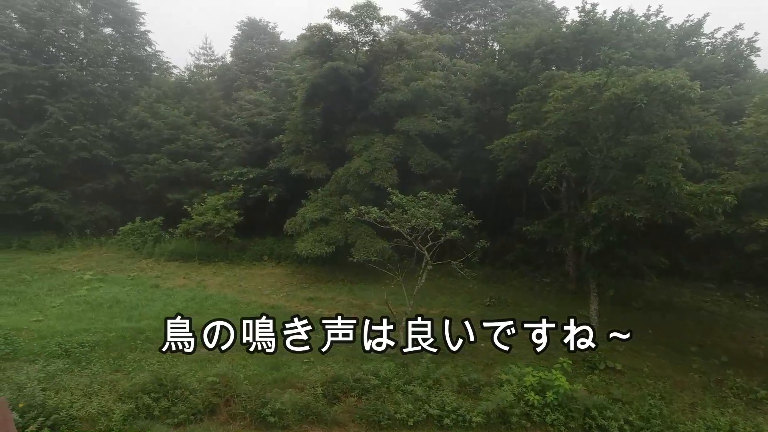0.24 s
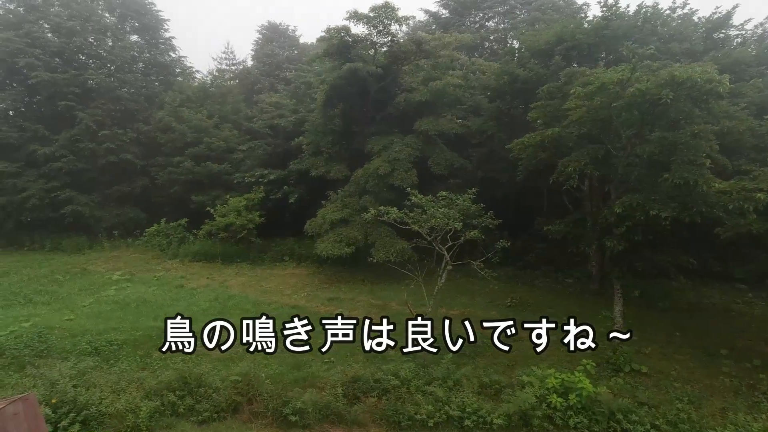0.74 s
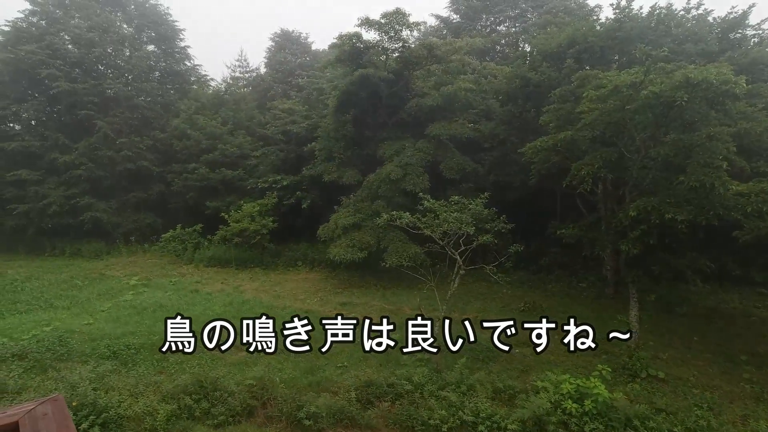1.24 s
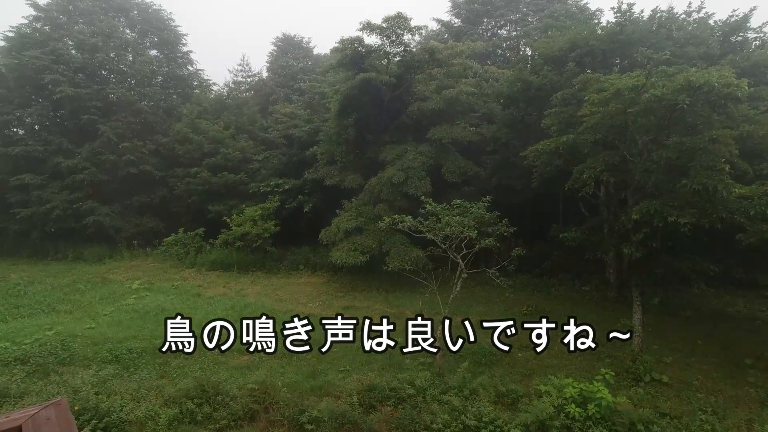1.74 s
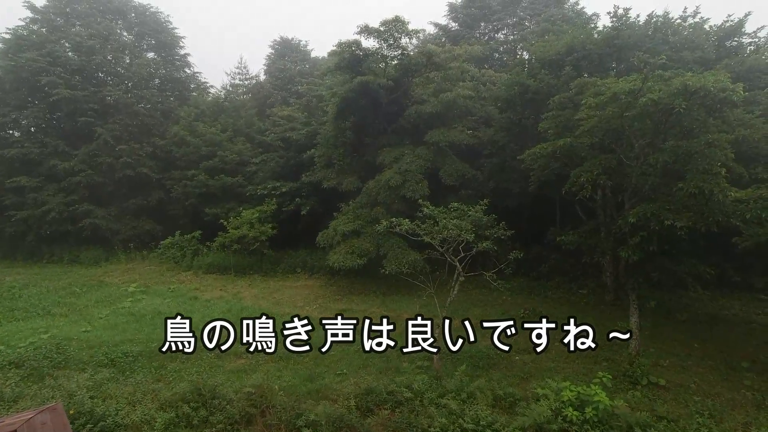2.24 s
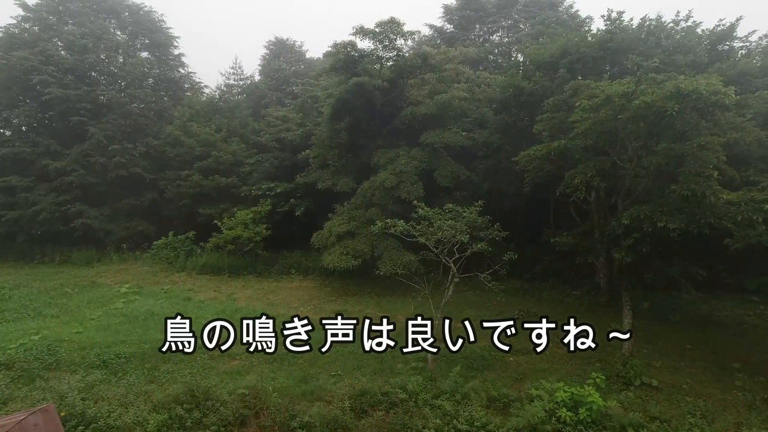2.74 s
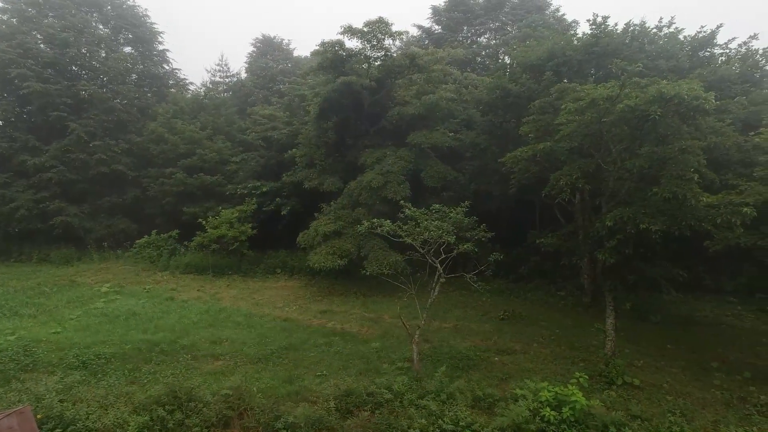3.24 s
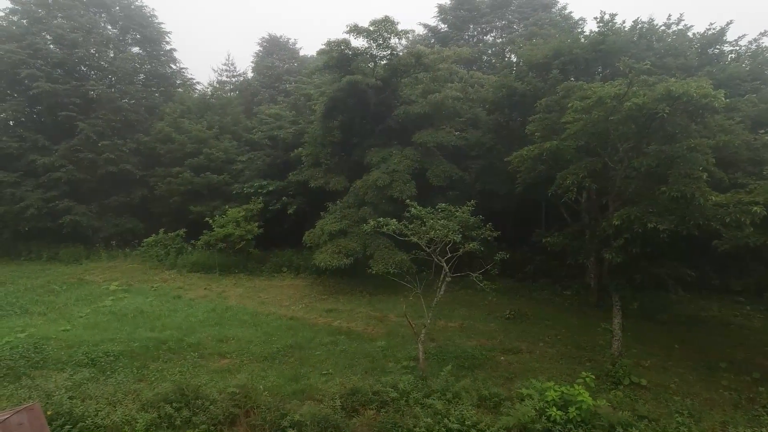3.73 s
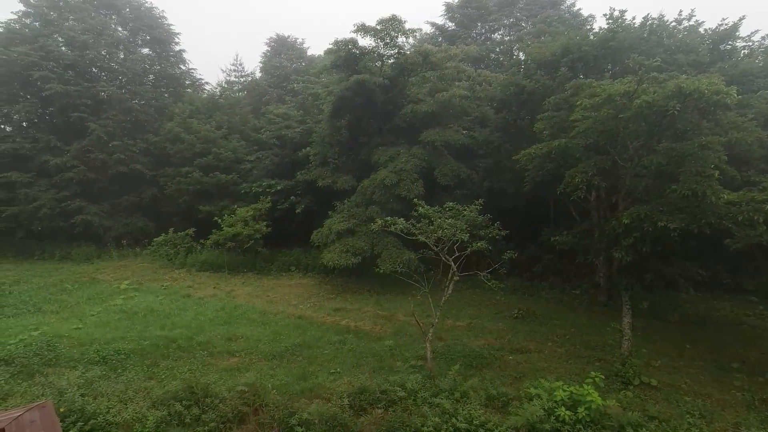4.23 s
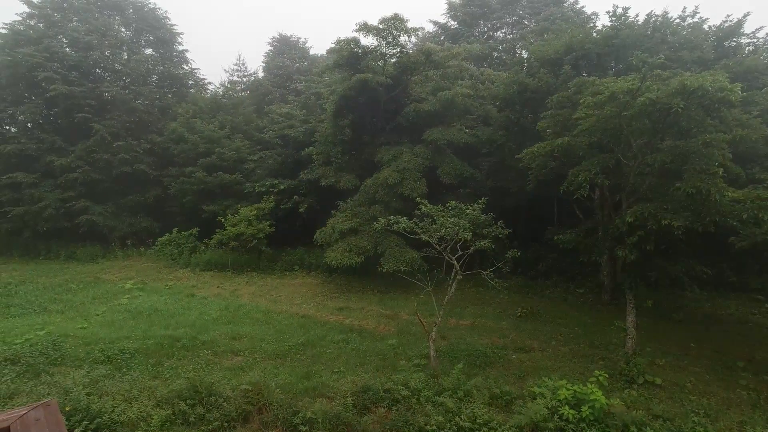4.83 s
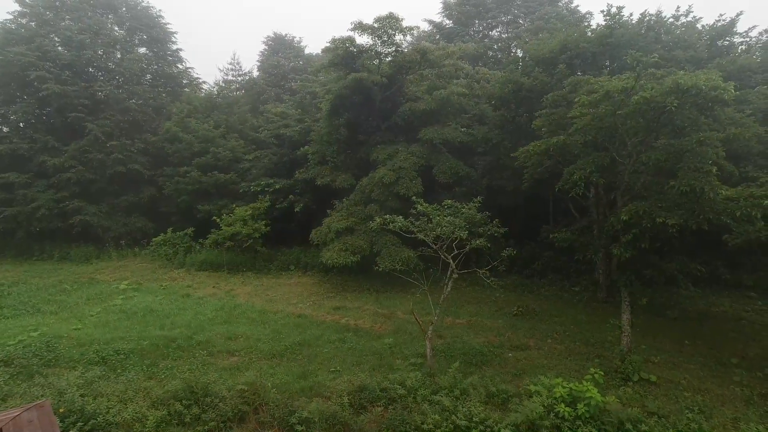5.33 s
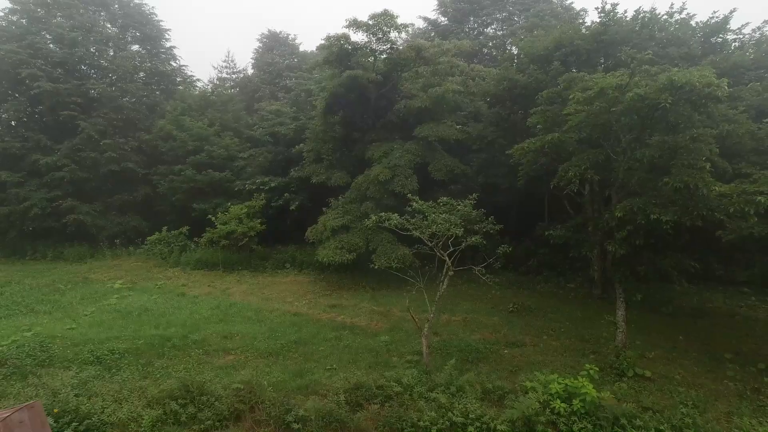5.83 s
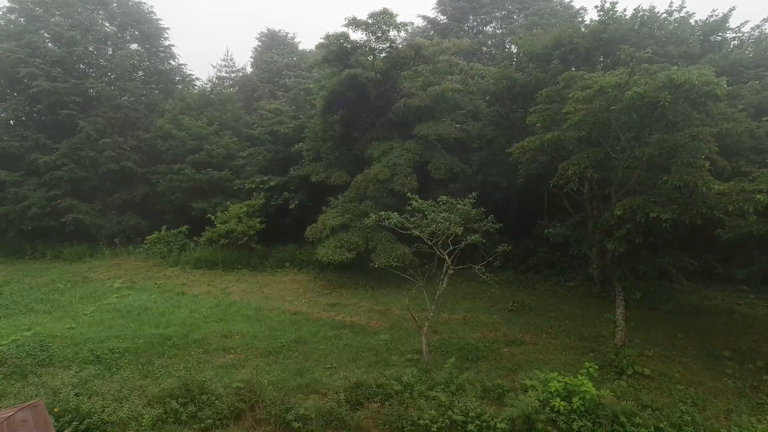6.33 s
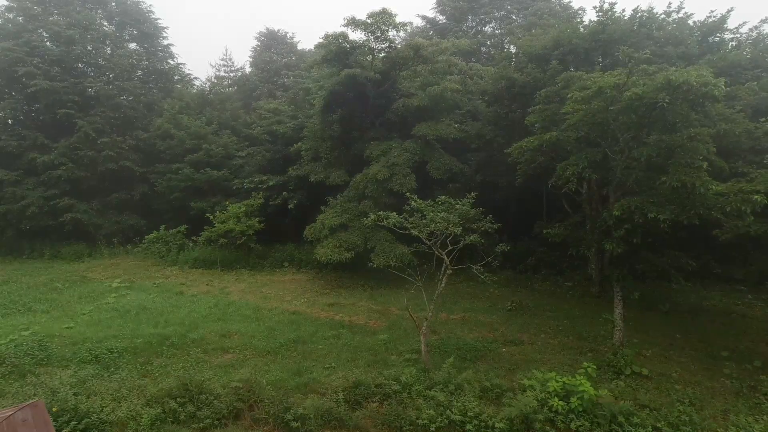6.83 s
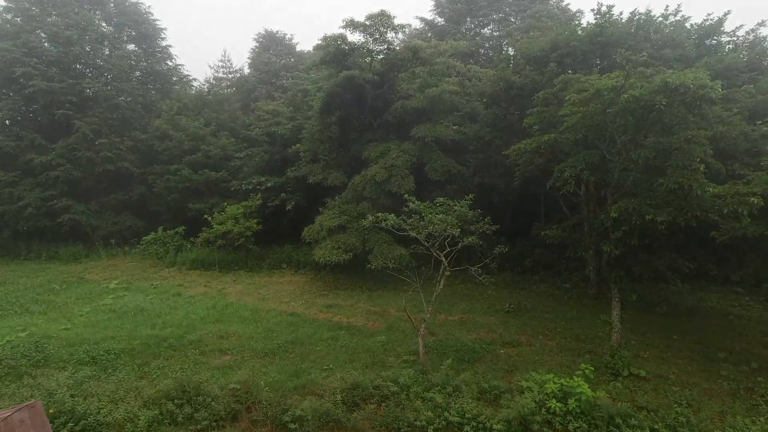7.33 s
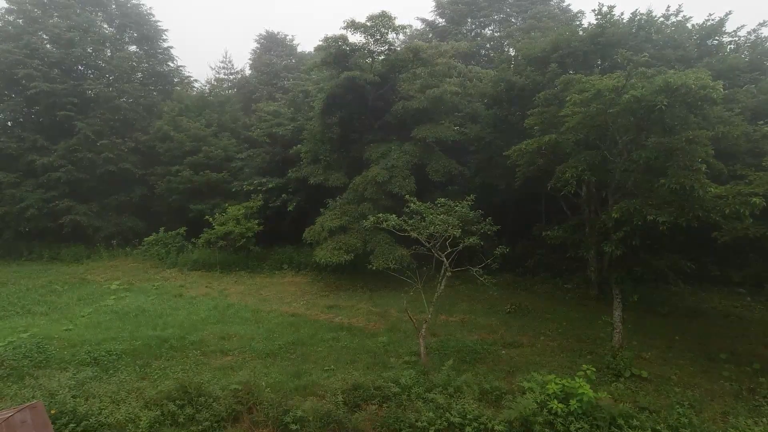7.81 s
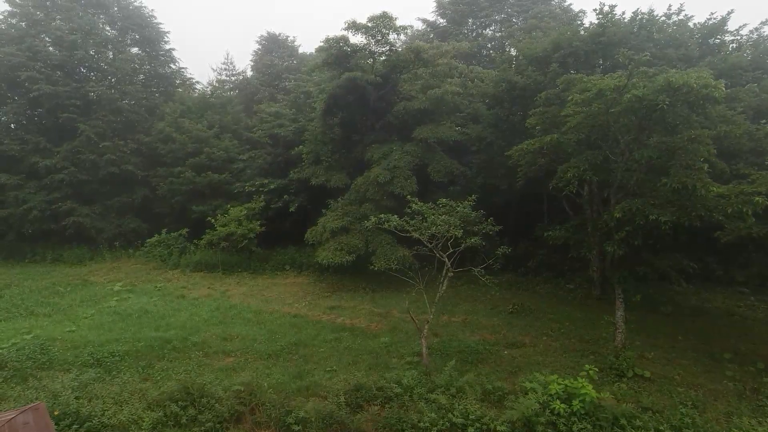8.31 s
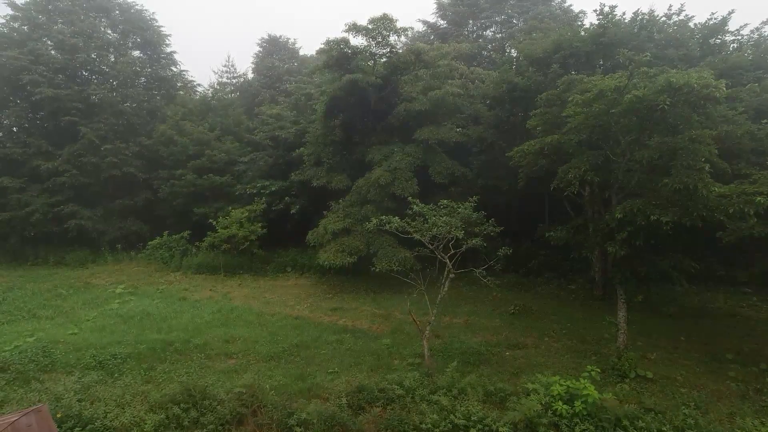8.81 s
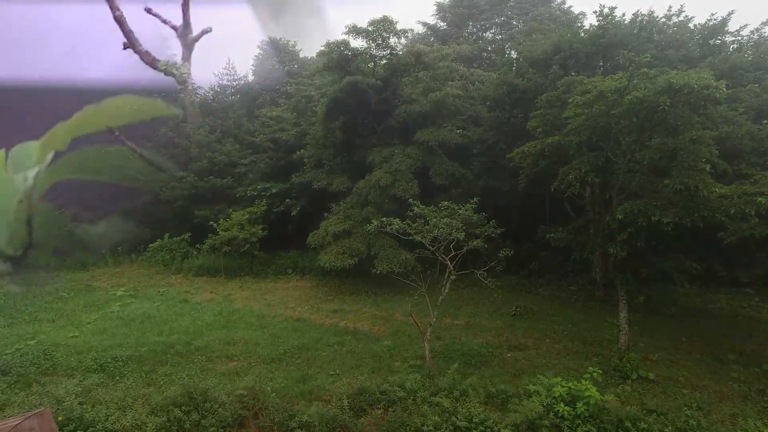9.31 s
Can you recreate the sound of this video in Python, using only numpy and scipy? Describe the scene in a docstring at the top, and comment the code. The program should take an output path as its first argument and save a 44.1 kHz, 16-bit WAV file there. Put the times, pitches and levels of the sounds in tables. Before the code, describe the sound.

Outdoor bird calls over a very soft hiss of far drizzle and leaves. A bright, slightly metallic whistle sounds first with a deep handling thump, then raspy scolding arrives in quick bursts, about twelve or thirteen rasps a second. The whistled phrase returns around four and seven seconds, each time amid chatter. Thin high peeps and low far whistles fill the gaps. A hollow wooden tap falls near five seconds; light rumble stays close to the microphone.

```python
"""A bird scolds in rasping chatter, each rasp a ragged pulse train coloured by throat resonances.
Another sings whistles of two gliding voices that mix into sum and difference tones at a misty wood's edge.
Farther birds chip and whistle faintly as hoarse gliding tones; sparse echoes make the trees answer.
A hand-held camera rumbles, hums and thumps on its mount, wooden modes ring under a knock and a
fainter, brighter one, and shaped noise gives distant drizzle and leaves."""
import sys
import numpy as np
from scipy import signal
from scipy.io import wavfile
from scipy.ndimage import uniform_filter1d

SR = 44100
rng = np.random.default_rng(int(sys.argv[2]) if len(sys.argv) > 2 else 0)


def dump(signal):
    """Clip the signal to [-1, 1] and save it as 16-bit WAV at the path in sys.argv[1]."""
    limited = np.clip(np.atleast_2d(signal).T, -1, 1)
    pcm = np.round(limited * 32767).astype(np.int16)
    wavfile.write(sys.argv[1], SR, pcm)


N = 421596


def amp(db):
    """Level law: decibels become a linear gain."""
    return 10 ** (np.asarray(db) / 20)


def evened(x):
    """Power normalization: scales a signal to rms 1."""
    return x / np.sqrt(np.mean(x ** 2) + 1e-20)


def read(points, hz):
    """Spectral envelope: interpolates a table along a log-frequency axis."""
    f, value = np.transpose(points)
    return np.interp(np.log(hz + 1), np.log(f + 1), value)


def add(mix, s, sound):
    """Superposition: adds a sound in place at time s in seconds."""
    part = mix[max(round(s * SR), 0):][:len(sound)]
    part += sound[:len(part)]


def unroll(rows):
    """Piecewise-linear motion: sample times and columns of a curve table."""
    s, *columns = np.transpose(rows)
    t = np.arange(s[0], s[-1], 1 / SR)
    return [t] + [np.interp(t, s, column) for column in columns]


def wander(count, hz):
    """Low-passed noise: smooth chance up to about hz, rms 1."""
    settling = 4000
    noise = rng.standard_normal(count + settling)
    return evened(signal.lfilter(*signal.butter(2, hz, fs=SR), noise)[settling:])


def tone(hz, db):
    """Phase accumulation: a sine of given rms level along a pitch curve, with soft ends."""
    phase = 2 * np.pi * np.cumsum(hz) / SR
    soft_ends = signal.windows.tukey(len(hz), min(250 / len(hz), 1))
    return np.sqrt(2) * amp(db) * np.sin(phase) * soft_ends


# Spectrum of drizzle and leaves. Each row: frequency in Hz, relative density in dB per Hz.
AIR_SPECTRUM = [(150, -37.5), (250, -0.5), (625, -6.5), (1790, -10.5), (2960, -14.5), (3400, -17),
                (4890, -19.5), (5910, -22), (6670, -23), (7150, -24), (14500, -36.5), (15600, -37)]
# Coherence of the two channels. Each row: frequency in Hz, left-right likeness from 0 to 1.
AIR_LIKENESS = [(250, .9999), (3000, 1), (8000, 0.26), (13000, .65)]
AIR_DB = -52.5  # rms level


def air():
    """Diffuse noise field: drizzle and leaves far off, smooth noise with faint drifting patches."""
    frames, hz = N // 256 + 5, np.fft.rfftfreq(1024, 1 / SR)
    a, b, c, d, patches = rng.standard_normal((frames, 513, 5)).T
    patches = evened(uniform_filter1d(uniform_filter1d(patches, 14, 0), 20, 1))
    apart = np.sqrt(np.clip(1 - read(AIR_LIKENESS, hz), 0, 1) / 2)[:, None]
    mid = np.sqrt(1 - apart ** 2) * (a + 1j * b)
    side = apart * (c + 1j * d)
    level_db = read(AIR_SPECTRUM, hz)[:, None] + 1.4 * patches
    spectrum = np.array([mid + side, mid - side]) * amp(level_db)
    noise = signal.istft(spectrum, nperseg=1024, noverlap=768)[1][:, :N]
    return amp(AIR_DB) * evened(noise)


def trees(x, t60, gap):
    """Multiple scattering: sparse random-sign trunk echoes, nearly alike at two close microphone ports."""
    length, spacing = SR // 2, 20  # samples
    taps = np.zeros((2, length))
    at = np.arange(0, length - spacing, spacing) + rng.integers(0, spacing, (2, (length - 1) // spacing))
    np.put_along_axis(taps, at, rng.choice([-1., 1.], at.shape), 1)
    t = np.arange(length) / SR
    # t60 is the decay time, gap the time constant of the build-up, both in seconds
    taps *= amp(-60 * t / t60) * (1 - np.exp(-t / gap))
    mid, side = signal.fftconvolve(x[None], taps / np.linalg.norm(taps[0]), axes=1)[:, :N]
    mid = mid * (1.24 + 0.49 * wander(N, 25))  # stirring leaves break the echoes up
    side = amp(-12.0) * signal.lfilter(*signal.butter(2, [3700, 6800], "band", fs=SR), side)
    return np.array([mid + side, mid - side])


# Sway of the mount. Each row: time in seconds, level in dB before its random swell.
SWAY_LEVEL = [(0.0, -49), (0.13, -46), (0.18, -14.5), (0.34, -32.5), (0.4, -20), (0.45, -39.5),
              (1.2, -38.5), (1.25, -50.5), (1.49, -47.5), (3.91, -52.5), (4.34, -43), (6.36, -52),
              (8.07, -48), (8.86, -58), (9.02, -26), (9.13, -30.5), (9.24, -53), (9.56, -58)]
# Housing resonances, buzz then hum. Each row: frequency in Hz, width in Hz.
HOUSING_MODES = [(95, 25.2), (185, 26.2)]
# Shifts of grip. Each row: start in seconds, length in seconds, buzz level in dB, hum level in dB.
GRIP_SHIFTS = [(0, 0.0467, -42, -43.5), (0.148, 0.029, -23, -24), (0.287, 0.07, -30, -28.5),
               (0.406, 0.097, -40, -37.5), (0.717, 0.25, -47.5, -49.5), (1.135, 0.051, -44.5, -43.5),
               (1.42, .2, -43, -47), (1.778, 0.034, -46, -58), (2.439, 0.0765, -48, -46.5),
               (2.834, 0.14006, -49.5, -48.5), (3.008, 0.029, -34, -58), (3.295, 0.19, -49, -67),
               (5.03, .12, -40.5, -44), (5.592, 0.12, -53, -55.5), (5.812, .08, -48, -52),
               (5.931, 0.0438, -46, -56), (6.943, 0.05606, -47, -49), (7.38, 0.03806, -46, -69),
               (7.566, 0.21, -46, -54.5), (8.087, 0.054, -47, -48), (8.448, 0.15, -48.5, -42.5),
               (8.679, 0.042, -57, -45.5), (8.852, 0.029, -47, -37.5), (8.948, 0.17, -40, -33),
               (9.25, 0.29, -52, -42)]
# Slow rocking after the first thump. Each row: time in seconds, level in dB.
ROCKING_LEVEL = [(.27, -32), (.315, -8.5), (.4, -19.5), (.55, -17), (.6, -31.5), (.75, -24), (1.1, -23),
                 (1.19, -31), (1.22, -53.5)]
# Sudden pushes. Each row: start in seconds, level in dB before filtering, push frequency in Hz.
PUSHES = [(0.173, -9, 146.2), (9.012, -18.5, 70.18)]
SWAY_HZ = 44.2
GRIP_RISE_S, GRIP_FALL_S = 0.023, 0.035
REST_DB, REST_LUMPS_DB = (-52.5, -58), 3.5  # buzz and hum under a steady hand, and their rms unevenness
ROCK_HZ, ROCK_TROUGH_S, ROCK_OCTAVE_DB = 10.45, .325, -13


def handling():
    """Forced resonance: grip rings the housing, the mount sways, sudden pushes thump and set it swinging."""
    t = np.arange(N) / SR
    sway_db = np.interp(t, *np.transpose(SWAY_LEVEL))
    sway_hz = SWAY_HZ * (1 + .11 * wander(N, 14))
    out = tone(sway_hz, sway_db) * (1.15 + .5 * wander(N, 20))
    for k, (hz, width) in enumerate(HOUSING_MODES):
        force = amp(REST_DB[k] + REST_LUMPS_DB * wander(N, 6.6))
        for s, length, *db in GRIP_SHIFTS:
            u = np.arange(0, length + .2, 1 / SR)
            rise = np.minimum(u / GRIP_RISE_S, 1)
            fall = np.exp(-np.maximum(u - length, 0) / GRIP_FALL_S)
            add(force, s, amp(db[k]) * rise * fall)
        # two slow noises in quadrature make a narrow band
        ring = wander(N, width) * np.cos(2 * np.pi * hz * t)
        ring += wander(N, width) * np.sin(2 * np.pi * hz * t)
        out += force * evened(ring)

    s, db = unroll(ROCKING_LEVEL)
    turn = 2 * np.pi * ROCK_HZ * (s - ROCK_TROUGH_S)
    octave = amp(ROCK_OCTAVE_DB) * wander(len(s), 5.7) * np.sin(2 * turn)
    soft_ends = signal.windows.tukey(len(s), .06)
    add(out, s[0], -np.sqrt(2) * amp(db) * soft_ends * (np.cos(turn) + octave))

    t = t[:SR // 3]
    for s, db, hz in PUSHES:
        push = np.sin(2 * np.pi * hz * t) * np.exp(-(t * hz) ** 2)
        onset = 1 - np.exp(-(t / 0.0054) ** 2)
        swing = amp(-5 - 60 * t / 0.16) * np.sin(2 * np.pi * SWAY_HZ * (t - .007)) * onset
        thump = signal.lfilter(*signal.butter(3, 420, fs=SR), push + swing)
        add(out, s - .002, amp(db) * thump)
    return out


# Modes of the boards. Each row: frequency in Hz, relative level in dB, decay time t60 in seconds.
WOOD_MODES = [(108, -12, 0.43), (239.6, -6.5, 0.29), (334.4, 1.5, 0.083), (427.95, -26, 0.1103),
              (655, -10.5, 0.085), (888, -18.5, 0.11), (1088.2, -25.5, 0.1746), (1693, -33, 0.049)]
# Each row: start in seconds, level in dB, brightness in dB an octave, scuff level in dB.
WOOD_KNOCKS = [(5.048, -23, 1, -53), (5.319, -50, 18, -44)]
# Band edges of the scuff in Hz.
SCUFF_BAND = [650, 2060]
SCUFF_T60_S = .16


def knocks():
    """Modal decay: boards ring briefly, roughened by rattling contact, under a short scuff."""
    out, t = np.zeros(N), np.arange(SR // 2) / SR
    for s, db, tilt_db, scuff_db in WOOD_KNOCKS:
        noise = rng.standard_normal(len(t))
        scuff = evened(signal.lfilter(*signal.butter(2, SCUFF_BAND, "band", fs=SR), noise))
        add(out, s, amp(scuff_db - 60 * t / SCUFF_T60_S) * scuff)
        for hz, mode_db, t60 in WOOD_MODES:
            rattle = 1 + (.25 + hz / 1500) * wander(len(t), 30 + hz / 6)
            level_db = db + mode_db + tilt_db * np.log2(hz / 328) - 60 * t / t60
            ring = amp(level_db) * np.sin(2 * np.pi * hz * t)
            add(out, s, ring * rattle * (1 - np.exp(-t / 0.0014)))
    return out


def glide(db, length, start_hz, end_hz, hoarse):
    """Random frequency modulation: a short gliding note; hoarseness wavers it until it smears into a band."""
    count = round(length * SR)
    hz = np.linspace(start_hz, end_hz, count) * (1 + 0.11 * hoarse ** 2 * wander(count, 410))
    unsteady = 1 + (0.12 + .5 * hoarse) * wander(count, 90)
    return tone(hz, db) * signal.windows.tukey(count, .4) * unsteady


# Hoarse rising chips with a lower twin; the first row is a hoarse burst standing for the fading echo
# of an earlier call. Each row: start in seconds, level in dB, twin in dB against it.
FAR_CHIPS = [(0, -54.5, 3), (2.901, -67, -15), (3.03, -71.5, -11), (4.927, -58, 0.5), (5.016, -60.5, 0),
             (5.12, -63, -13), (5.24, -59, -11), (7.898, -62, -1.5), (7.998, -66, -9.5), (8.625, -62.5, 3),
             (8.716, -63.5, 4), (8.812, -62, -2), (9.003, -64, 3.5)]
# Thin double ticks before a phrase. Each row: start in seconds, level in dB.
FAR_TICKS = [(3.411, -58.5), (3.475, -58), (3.551, -67), (6.6, -62.5), (6.663, -54), (6.73, -51),
             (6.802, -51)]
# Clear short notes. Each row: start in seconds, pitch in Hz, level in dB.
FAR_PEEPS = [(5.129, 6400, -51), (5.263, 6631, -50.5), (5.262, 8550, -60.5), (5.411, 6700, -51),
             (5.43, 8169, -56), (5.556, 6670, -42), (5.711, 6570, -49), (5.837, 5660, -64),
             (5.975, 5640, -63.5), (8.974, 6444, -55), (8.978, 8310, -54.5), (9.024, 6918, -62),
             (9.093, 8200, -56.5), (9.135, 6480, -51), (9.186, 8300, -57)]
# Falling seeps, each with a hoarse, slowly falling trail. Each row: start in seconds, start pitch in Hz,
# end pitch in Hz, level in dB, trail length in seconds, trail level in dB.
FAR_SEEPS = [(1.192, 8300, 7720, -63, 0.0442, -67), (1.361, 7750, 7300, -50.5, 0.34, -62),
             (2.28, 7164, 6829, -69, 0.2417, -71), (5.85, 7300, 7050, -75, 0.3075, -70),
             (8.256, 7800, 7200, -51, 0.388, -71), (8.861, 7860, 7266, -46.5, 0.068, -52),
             (9.05, 8000, 7532, -61, 0.074, -65.5)]
# Clear upward hooks. Each row: start in seconds, start pitch in Hz, level in dB.
FAR_HOOKS = [(9.306, 6049, -45), (9.307, 4750, -53), (9.488, 5917, -40.5)]
# Low distant whistles. Each row: start in seconds, length in seconds, start pitch in Hz,
# end pitch in Hz, level in dB.
FAR_COOS = [(0.977, .23, 1720, 1700, -66.5), (4.598, .22, 1654, 1647, -61.5), (4.8, .2, 1440, 1430, -62),
            (7.932, 0.2546, 1420, 1440, -63.5), (8.14, .13, 1426, 1411, -58), (8.558, .04, 1500, 2010, -58)]
# Note shapes: length in seconds, start pitch in Hz, end pitch in Hz, hoarseness from 0 to 1.
CHIP, CHIP_TWIN = (0.084, 6300, 7250, 0.68), (0.0406, 5100, 5650, 0.77)
TICK, TICK_TWIN, TICK_TWIN_DB = (0.05436, 7380, 7350, 0.24), (0.032, 8550, 8400, 0.7049), -1.5
# Rises and falls are shares of the pitch.
PEEP_S, PEEP_FALL, PEEP_HOARSE = 0.049, .015, .3
SEEP_S, SEEP_HOARSE, TRAIL_HOARSE, TRAIL_FALL = .065, 0.39, 0.49, .03
HOOK_S, HOOK_RISE, HOOK_HOARSE = 0.043, 0.128, 0.4


def far_birds():
    """Swept tones: chips, ticks, peeps, seeps, hooks and low whistles from deeper in the wood."""
    out = np.zeros(N)
    for s, db, twin_db in FAR_CHIPS:
        add(out, s, glide(db, *CHIP))
        add(out, s + 0.0071, glide(db + twin_db, *CHIP_TWIN))
    for s, db in FAR_TICKS:
        add(out, s, glide(db, *TICK))
        add(out, s, glide(db + TICK_TWIN_DB, *TICK_TWIN))
    for s, hz, db in FAR_PEEPS:
        add(out, s, glide(db, PEEP_S, hz, hz * (1 - PEEP_FALL), PEEP_HOARSE))
    for s, start_hz, end_hz, db, trail_s, trail_db in FAR_SEEPS:
        add(out, s, glide(db, SEEP_S, start_hz, end_hz, SEEP_HOARSE))
        trail = glide(trail_db, trail_s, end_hz, end_hz * (1 - TRAIL_FALL), TRAIL_HOARSE)
        add(out, s + SEEP_S, trail)
    for s, hz, db in FAR_HOOKS:
        add(out, s, glide(db, HOOK_S, hz, hz * (1 + HOOK_RISE), HOOK_HOARSE))
    for s, length, start_hz, end_hz, db in FAR_COOS:
        add(out, s, glide(db, length, start_hz, end_hz, .15))
    return out


CLIMB_FROM_S, CLIMB_S = 0.0726, 0.0649  # when a note moves off its pattern, and how long that takes
SAG_FROM_S, SAG_S = .17, 0.02  # the same for its close


def sing(s, level_db, low, high, mixing, unsteady, climb_hz=0, low_sag_hz=0, high_sag_hz=0, lift_db=0):
    """Nonlinear mixing: two whistling voices sound together and create sum and difference tones."""
    diff_db, sum_db, fifth_db = mixing
    t, hz, db, octave_db = unroll(low)
    climb = np.clip((t - CLIMB_FROM_S) / CLIMB_S, 0, 1)
    sag = np.clip((t - SAG_FROM_S) / SAG_S, 0, 1)
    hz = hz + climb_hz * climb - low_sag_hz * sag
    db = db + level_db + lift_db * sag
    overtones = tone(2 * hz, db + octave_db) + tone(3 * hz, db - 49.5)
    coming_and_going = 1 + .5 * wander(len(t), 80)
    lower = tone(hz, db) + coming_and_going * overtones

    t2, hz2, db2 = unroll(high)
    hz2 = hz2 - high_sag_hz * np.interp(t2, t, sag)
    hz2 = hz2 * (1 + 0.012 * unsteady * wander(len(t2), 150))
    db2 = db2 + level_db
    under_hz = np.interp(t2, t, hz)
    # mixing weakens where the low voice is weak
    both_db = db2 + np.interp(t2, t, np.minimum(db - np.median(db), 0), left=-60)
    mixed = tone(hz2 - under_hz, both_db + diff_db) + tone(hz2 + under_hz, both_db + sum_db)
    upper = tone(hz2, db2) + mixed + tone(hz2 * 3 / 2, db2 + fifth_db)
    upper = upper * (1 + unsteady * wander(len(t2), 130))
    return [(s + t[0], lower), (s + t2[0], upper)]


def slur(s, level_db, rows, octave_db=-60):
    """Frequency sweep: a quick glide whose octave is strongest near 6650 Hz and fades away from it."""
    t, hz, db = unroll(rows)
    hz, db = uniform_filter1d(hz, 60), db + level_db
    return s + t[0], tone(hz, db) + tone(2 * hz, db + octave_db - abs(hz - 6650) / 60)


# Pattern times count from the note's start, and pattern levels are relative to the note's level.
# Low voice of the long whistle. Each row: time in seconds, pitch in Hz, level in dB, octave in dB against it.
LONG_LOW = [(.024, 3260, -14.5, -15.5), (.039, 3350, -5.5, -31), (0.073, 3457, -1.1, -51),
            (0.114, 3505, -4, -50.5), (.15, 3522, -9.5, -27), (.175, 3560, -12.5, -10.5),
            (.198, 3510, -28, -13)]
# High voice of the long whistle. Each row: time in seconds, pitch in Hz, level in dB.
LONG_HIGH = [(.11, 4950, -50), (.135, 5320, -39), (.156, 5640, -26), (.169, 5620, -24.5),
             (0.198, 5230, -20.5)]
# Two glides beside the long whistle. Each row: time in seconds, pitch in Hz, level in dB.
LONG_SLURS = [
    [(0, 3530, -34), (.01, 4020, -14), (.018, 3310, -14.5), (.025, 4900, -5), (.029, 4780, -14),
     (.034, 4970, -25)],
    [(.042, 7300, -57), (.06, 7360, -49), (.13, 7600, -50), (.145, 7630, -62)],
]
# Low voice of the arched opening note. Each row: time in seconds, pitch in Hz, level in dB,
# octave in dB against it.
ARCHED_LOW = [(.027, 3050, -11, -30.5), (.04, 3250, -3.5, -6), (.062, 3360, -3.5, -2), (.1, 3455, -1.5, -7),
              (.121, 3490, -5, -27.5), (.128, 3430, -29, -32)]
# High voice of the arched note. Each row: time in seconds, pitch in Hz, level in dB.
ARCHED_HIGH = [(.014, 7520, -8.5), (.038, 7960, -7), (0.06, 8192, -4.5), (.121, 8235, -2), (.13, 7971, -24)]
# Glides that open and close the arched note. Each row: time in seconds, pitch in Hz, level in dB.
ARCHED_SLURS = [
    [(0, 2800, -2), (.005, 4850, 2.5), (.009, 6520, -3.5), (.013, 7573, -11), (.018, 7600, -16)],
    [(.119, 8120, -10), (.123, 7670, 1), (.127, 7181, -19)],
]
# Two glides of the rising flourish between them. Each row: time in seconds, pitch in Hz, level in dB.
FLOURISH_GLIDES = [
    [(0, 2433, -6), (.013, 3346, -14.5), (.02, 5290, -3.5), (.026, 6240, -10), (.033, 6580, -4.5),
     (.038, 5900, -11), (.042, 6500, -1.5), (.049, 6400, -24.5)],
    [(.001, 2011, -24), (.014, 2370, -24.5), (.025, 2900, -16)],
]
# Each row: start in seconds, level in dB, pitch shift from the pattern in Hz, closing sag of the low voice
# in Hz, of the high voice in Hz (negative rises), closing lift of the low voice in dB.
LONG_WHISTLES = [(.071, -19.5, -38, 270.5, 796, 7.5), (4.007, -18, 12, -5, -4, 4),
                 (7.206, -16.5, 50.5, 42, 100, -4)]
# Each row: start in seconds, level in dB.
ARCHED_NOTES = [(3.629, -34.5), (6.833, -33.5)]
# Each row: start in seconds, level in dB.
FLOURISH_NOTES = [(3.865, -24), (7.066, -24.5)]
# The two voices share one windpipe: dB against the high voice of difference tone, sum tone, fifth above.
LONG_MIXING, ARCHED_MIXING = (-8, -4.5, -31), (-3.5, -28, -32)


def singer():
    """Two coupled voices: whistles, arches and flourishes, each from its own pattern."""
    out, parts = np.zeros(N), []
    for s, db, *sags in LONG_WHISTLES:
        parts += sing(s, db, LONG_LOW, LONG_HIGH, LONG_MIXING, 0.38, *sags)
        parts += [slur(s, db, rows) for rows in LONG_SLURS]
    for s, db in ARCHED_NOTES:
        parts += sing(s, db, ARCHED_LOW, ARCHED_HIGH, ARCHED_MIXING, .15)
        parts += [slur(s, db, rows) for rows in ARCHED_SLURS]
    for s, db in FLOURISH_NOTES:
        parts += [slur(s, db, rows, octave_db=-25) for rows in FLOURISH_GLIDES]
    for s, sound in parts:
        add(out, s, sound)
    return out * (1 + 0.18 * wander(N, 91))  # the air on the way makes the level flutter


# Each row, one rasp: start in seconds, length in seconds, level in dB before throat and swell.
RASPS = [(0.372, 0.047, -35), (.424, 0.059, -34), (0.507, 0.047, -34), (0.593, 0.041, -34.5),
         (0.683, 0.043, -33.5), (0.763, .047, -34.5), (0.85, 0.046, -35.5), (1.13, 0.038, -47),
         (1.2, 0.049, -46.5), (1.275, 0.04065, -42.5), (1.337, 0.046, -43), (1.412, 0.045, -40),
         (1.479, 0.047, -40.5), (1.557, 0.039, -40), (1.629, 0.049035, -32), (1.701, .043, -31.5),
         (1.779, 0.046, -31.5), (1.86, 0.05, -32), (1.949, 0.042, -31.5), (2.068, 0.041, -33.5),
         (2.14, 0.039, -31.5), (2.226, 0.047, -34.5), (2.589, 0.04738, -34), (2.649, .055, -33.5),
         (2.731, .045, -33.5), (3.336, 0.047, -47), (3.394, 0.052, -46), (3.472, 0.047, -45.5),
         (3.546, 0.046, -43), (3.617, 0.053, -42.5), (3.691, .047, -41.5), (3.755, 0.054, -42),
         (3.849, 0.044, -34.5), (3.915, 0.054, -40.5), (4.275, 0.046, -31.5), (4.342, 0.05, -31.5),
         (4.42, 0.05077, -35), (5.434, 0.043, -30), (5.496, .053, -31.5), (5.571, 0.043576, -31.5),
         (5.655, 0.048, -33.5), (6.526, 0.049, -44), (6.579, 0.05972, -44.5), (6.663, 0.042, -42),
         (6.731, 0.04982, -42), (6.81, 0.04427, -39.5), (6.873, 0.043, -40.5), (6.935, 0.069, -40.5),
         (7.034, 0.061, -35.5), (7.105, 0.038, -39.5), (7.498, 0.054, -30.5), (7.554, 0.05, -30.5),
         (7.627, 0.052, -30.5), (7.711, 0.044, -30), (9.36, .046, -31), (9.416, 0.047, -32),
         (9.493, .045, -33)]
# Each row, one bout of rasps: start in seconds, treble offset at its start in dB,
# treble offset once settled in dB, lift of the low band in dB.
RASP_BOUTS = [(.35, -13, 2.5, 1.5), (1.1, -9, -3, 4.2), (1.61, -5, 1.2, 1.4), (2.04, 0, -6, 1),
              (2.56, -17, -4.5, .9), (3.31, -7, 1, 3.5), (3.83, 3.5, -3.5, 1.6), (4.25, -8.5, .6, 1),
              (5.41, -8.5, -0.5, 0.2), (6.5, -11, 1, 1.1), (7.01, 5, 1.8, 1.5), (7.47, -17, -2, -0.6),
              (9.33, -7.5, 0.5, -0.4)]
# Throat resonances of the scolding bird. Each row: frequency in Hz, gain in dB.
THROAT_GAIN = [(1150, -42.5), (1700, -15.5), (2150, -8), (2700, -6.5), (2950, -14.5), (3150, -39),
               (3450, -4.5), (4250, 2.5), (4900, -4.5), (5450, -13), (6200, -15), (7200, -14), (8300, -23),
               (10000, -36), (13500, -51.5)]
PULSE_HZ, PULSE_SPREAD = 582.4, 0.011093  # mean pulse rate and its relative scatter from rasp to rasp
WARM_UP_S = 0.074  # time constant with which the treble of a bout settles
BEAK_OPENS, HIGHER_PER_SOFT_DB = 0.16, .006  # shares of the throat pitch: through a rasp, per dB softer


def chatter():
    """Source and filter: ragged pulses near 600 a second excite a throat; both shake 87 times a second."""
    out = np.zeros(N)
    k = np.arange(2, 24)[:, None]  # harmonic numbers
    for s, length, db in RASPS:
        bout_s, start_db, settled_db, low_db = [b for b in RASP_BOUTS if b[0] <= s][-1]
        pulse_hz = PULSE_HZ * (1 + PULSE_SPREAD * rng.standard_normal())
        top_db = settled_db + (start_db - settled_db) * np.exp(-(s - bout_s) / WARM_UP_S)
        t = np.arange(-.015, length + 0.01275, 1 / SR)
        u = t / length
        shake_turns = 87 * t + 0.061 * wander(len(t), 39.761) + rng.random()
        shake = uniform_filter1d(signal.sawtooth(2 * np.pi * shake_turns, .4), 60)
        swing = 1 + .15 * shake
        f = k * pulse_hz * (1 + .08 * (u - .5) + .012 * wander(len(t), 400)) * swing

        # the beak opens through the rasp; soft rasps sit higher
        mouth = 1 + BEAK_OPENS * (u - .5) - HIGHER_PER_SOFT_DB * (db + 32.5)
        mouth_share = np.clip((7200 - f) / 1400, .3, 1)
        swing_share = np.clip((4300 - f) / 1000, .2, 1)  # low resonances swing fully, upper ones a little
        throat_db = read(THROAT_GAIN, f / mouth ** mouth_share / swing ** swing_share)
        lift_db = (low_db + 2.7 * shake) * (f / swing < 3100)
        lift_db = lift_db + top_db * np.clip((f - 5600) / 800, 0, 1)

        # uneven pulses smear high overtones most
        ragged = 1 + .042 * k * np.array([wander(len(t), 200) for _ in k])
        phase = 2 * np.pi * (np.cumsum(f, axis=1) / SR + rng.random(k.shape))
        voice = (amp(throat_db + lift_db) * ragged * np.cos(phase)).sum(0)
        # swells, then stops short
        swell_db = np.interp(u, [-0.48, 0.051, 0.24, 0.846, 0.9, 1.62], [-34, -4.5, -2.0, 3.0, -1, -22.5])
        add(out, s - .015, amp(db + swell_db) * voice * signal.windows.tukey(len(t), .2))
    return out


def scene():
    """Direct-to-reverberant ratio: near birds are mostly direct, far ones carry more and longer echo."""
    scold, song, far, wood = chatter(), singer(), far_birds(), knocks()
    direct = scold + song + amp(0.5) * far + wood
    echoes = amp(-12.0) * trees(scold, 0.25, 0.0026)
    echoes += amp(-11.5) * trees(song, 0.36, 0.0021)
    echoes += amp(-7.0) * trees(far, 0.56, 0.0032)
    echoes += amp(-2.0) * trees(wood, 0.45, 0.006186)
    return direct + echoes + air() + handling()


EDGE_HZ = 15720


def record(dry):
    """Band limiting: a steep linear-phase low-pass removes the highest treble."""
    lowpass = signal.firwin(1023, EDGE_HZ, window=("kaiser", 9), fs=SR)
    return signal.oaconvolve(dry, lowpass[None], "same")


dry = scene()
out = record(dry)
dump(out)
```